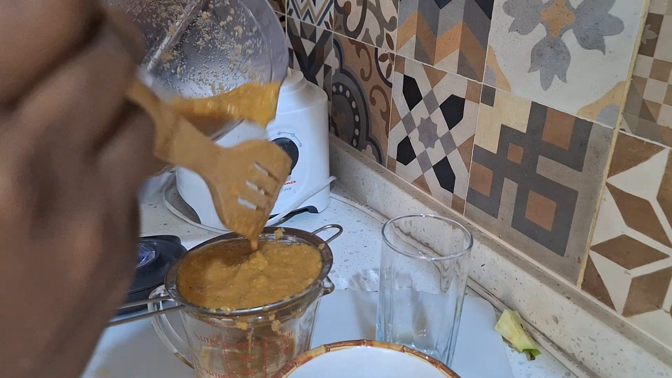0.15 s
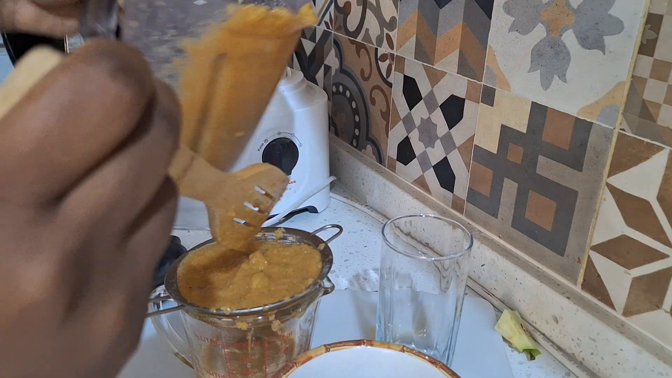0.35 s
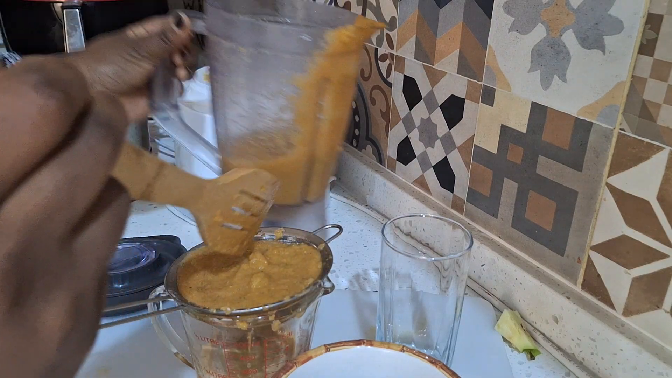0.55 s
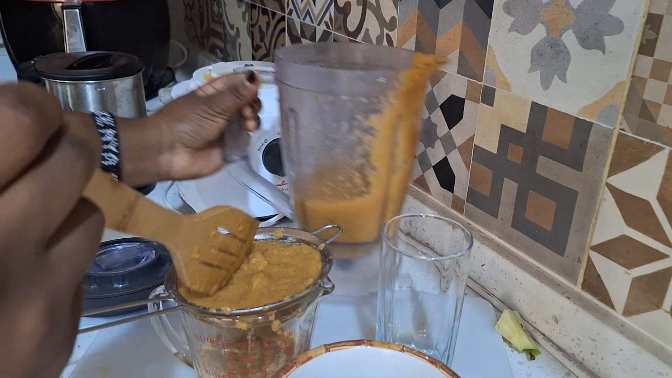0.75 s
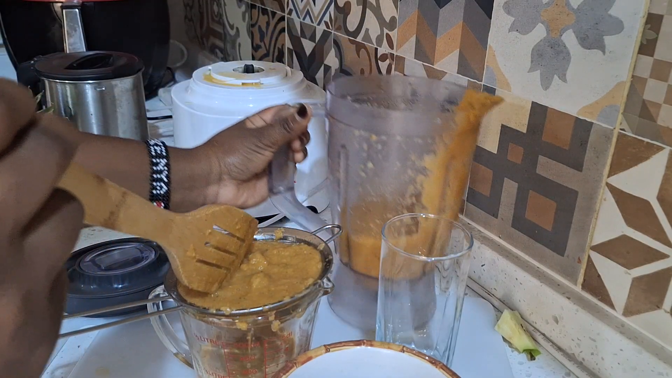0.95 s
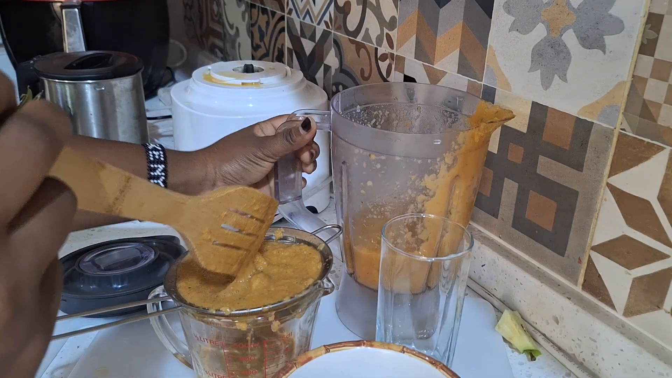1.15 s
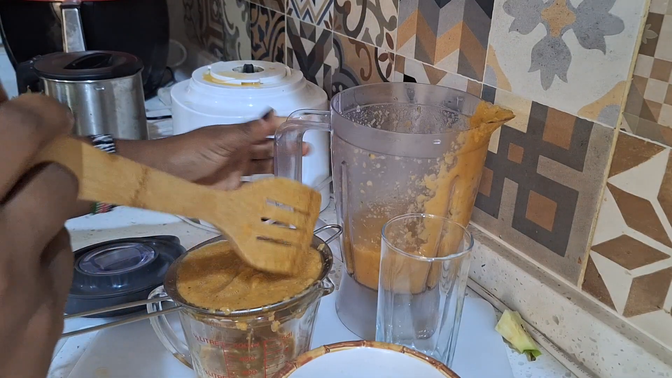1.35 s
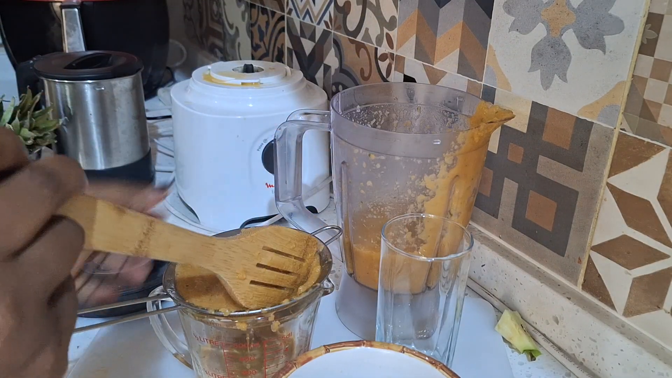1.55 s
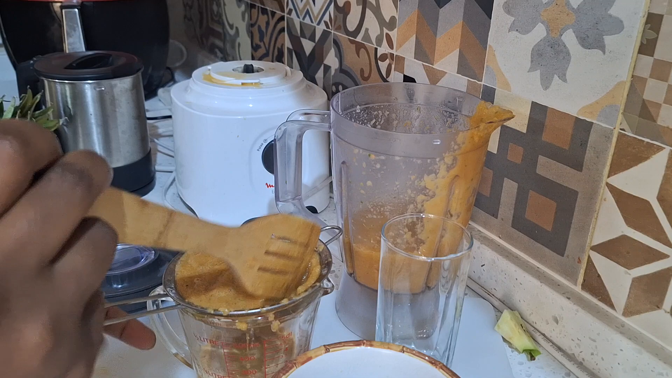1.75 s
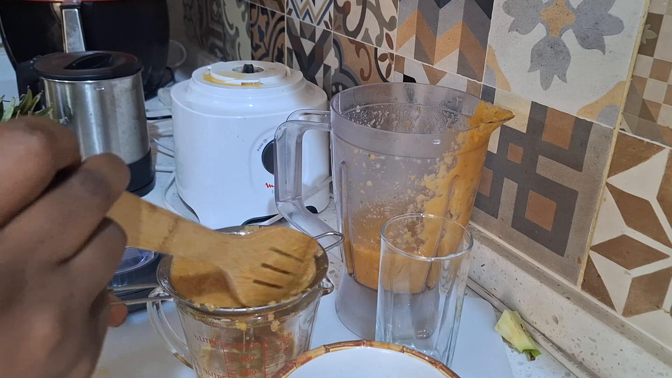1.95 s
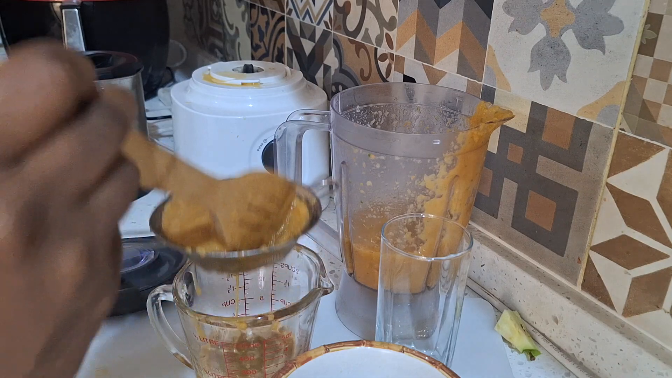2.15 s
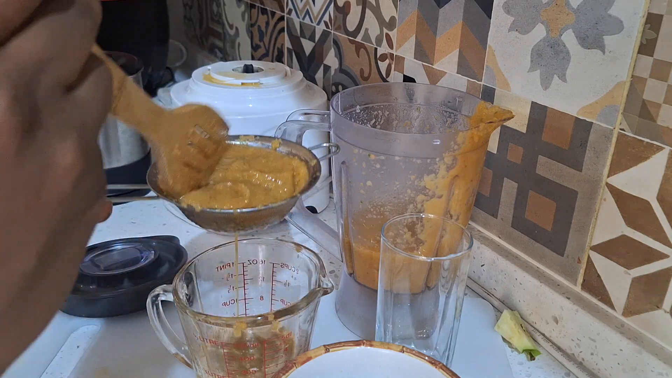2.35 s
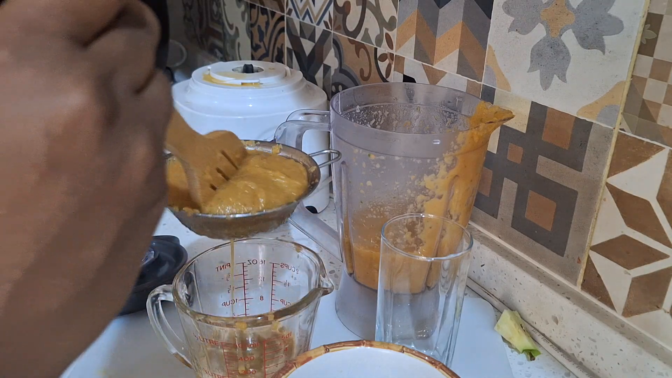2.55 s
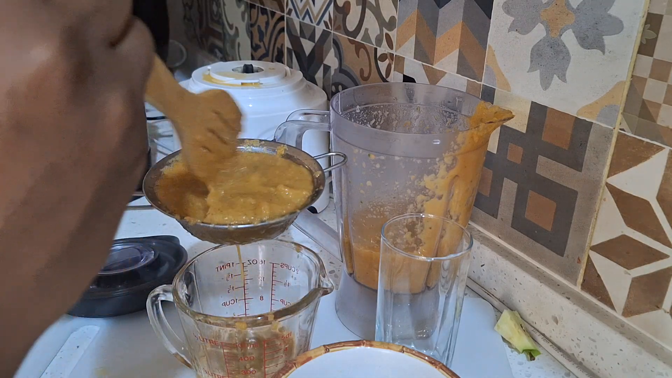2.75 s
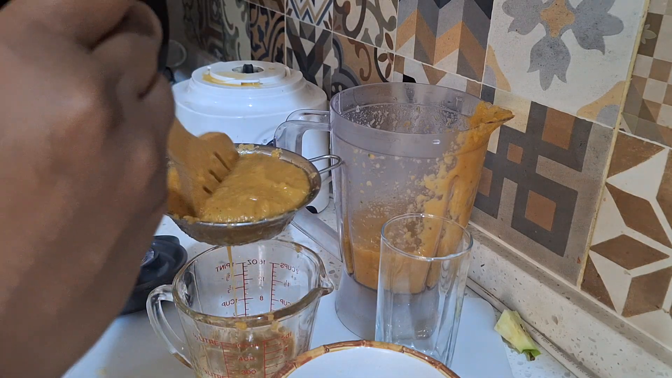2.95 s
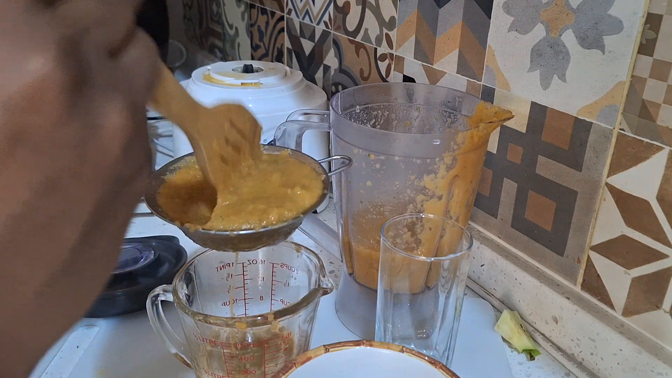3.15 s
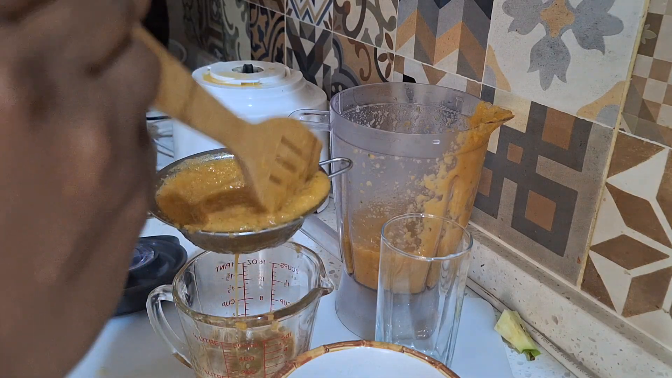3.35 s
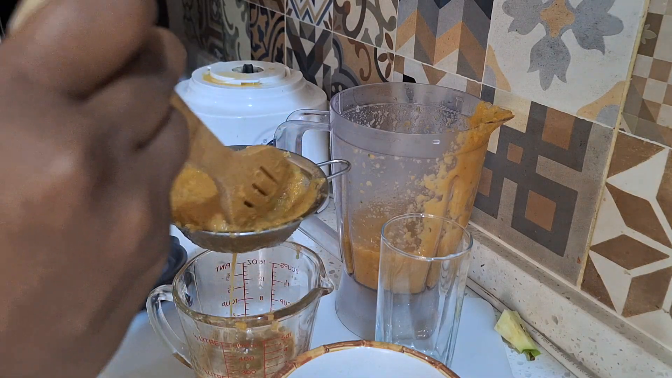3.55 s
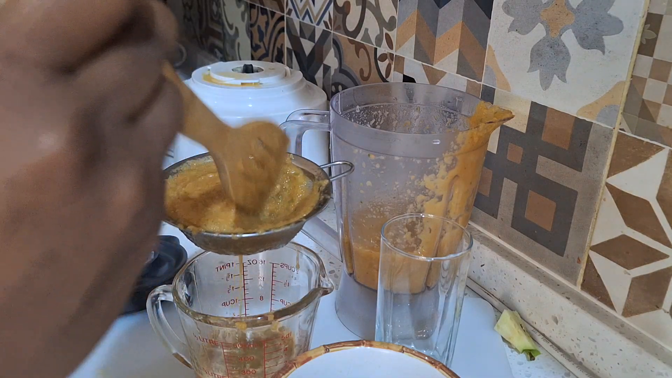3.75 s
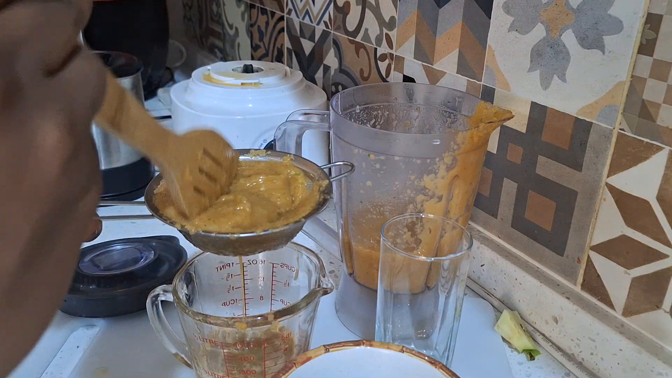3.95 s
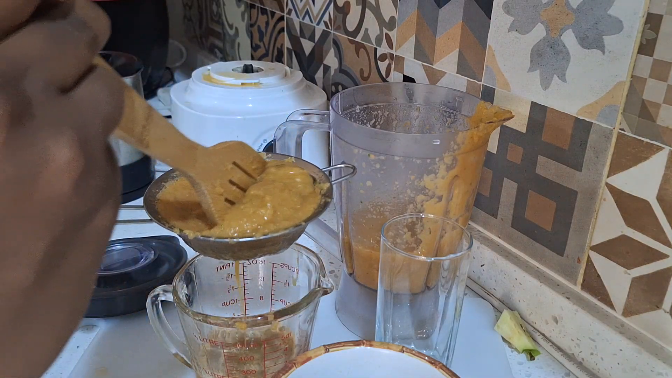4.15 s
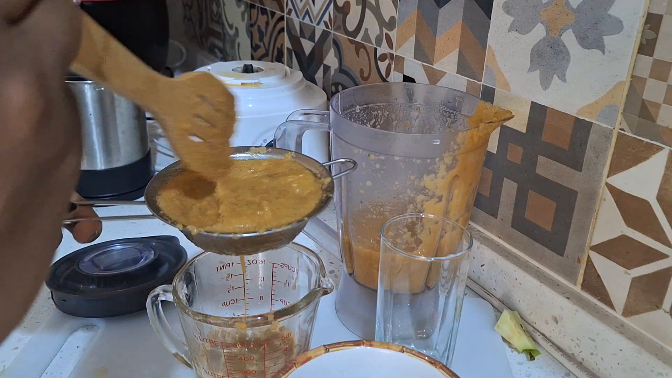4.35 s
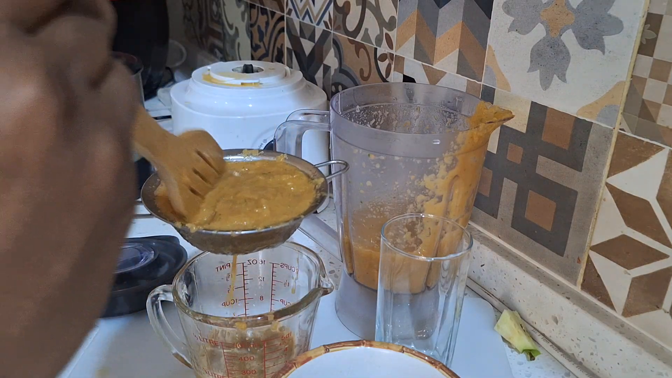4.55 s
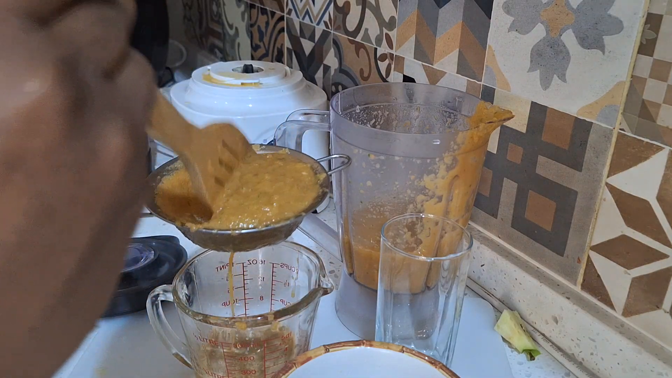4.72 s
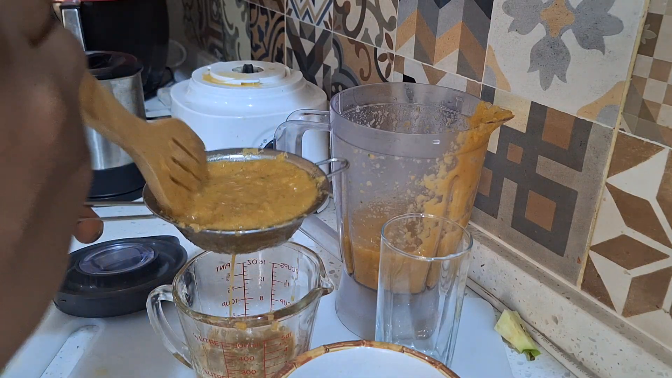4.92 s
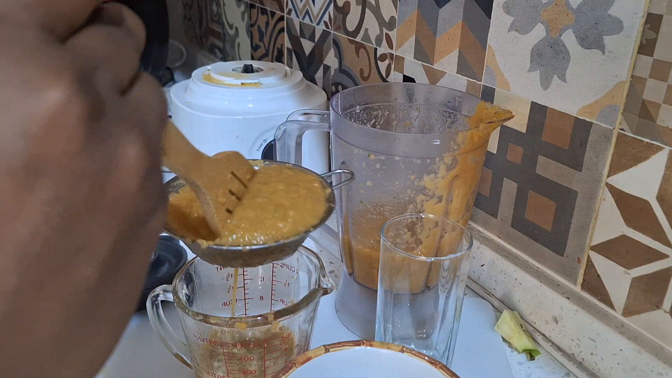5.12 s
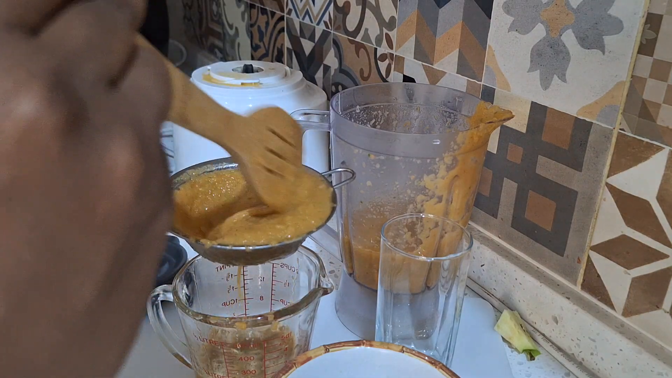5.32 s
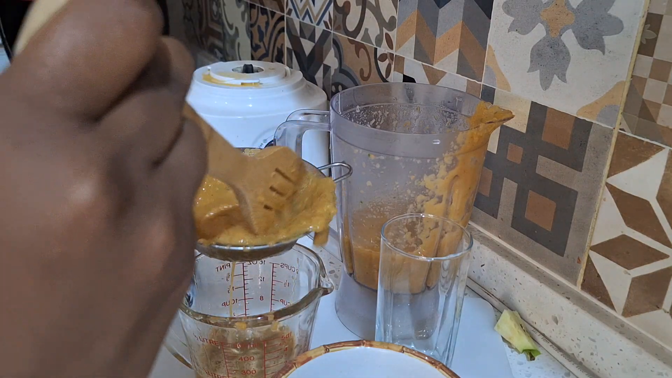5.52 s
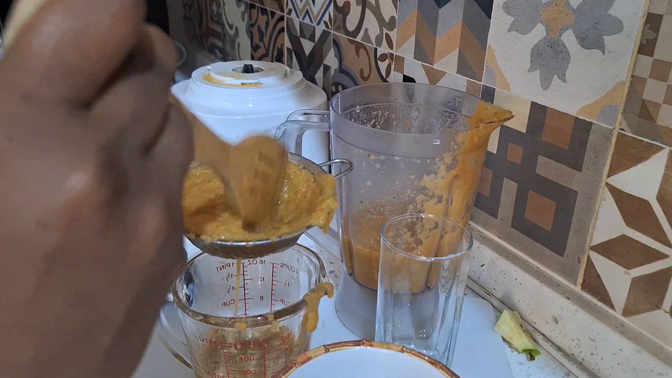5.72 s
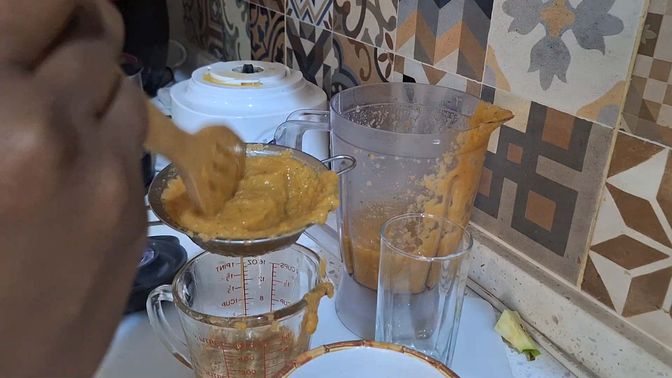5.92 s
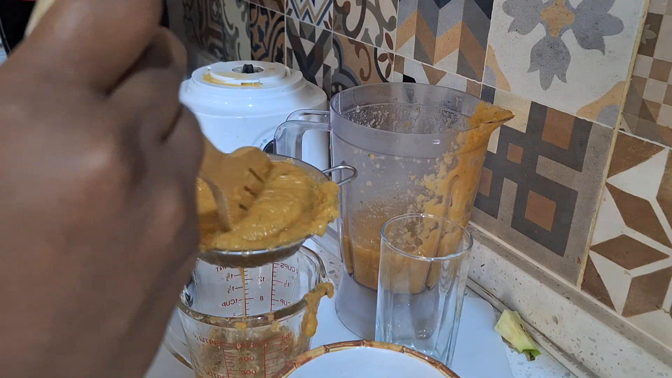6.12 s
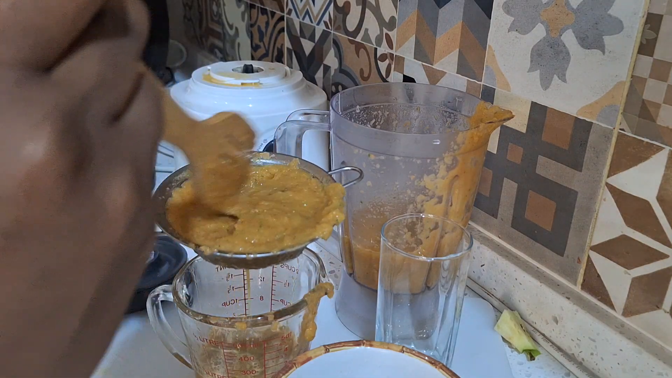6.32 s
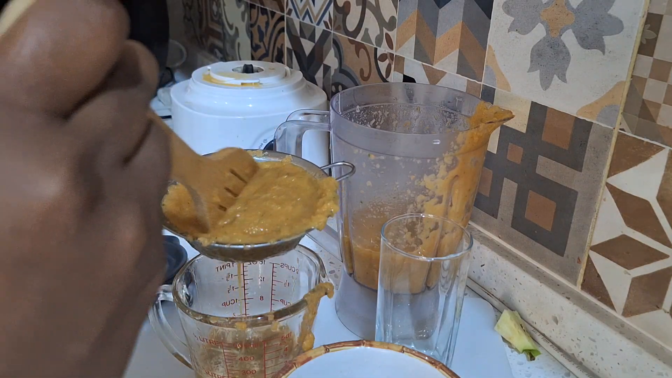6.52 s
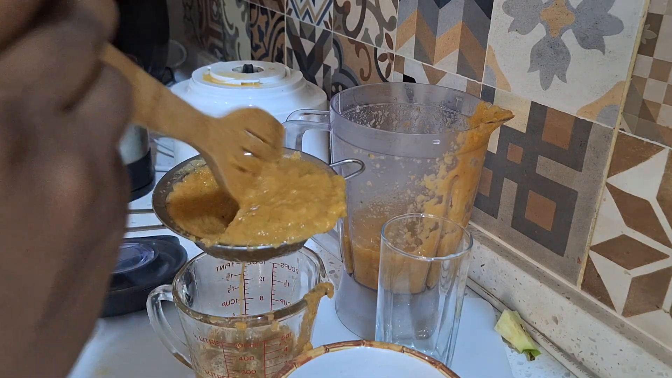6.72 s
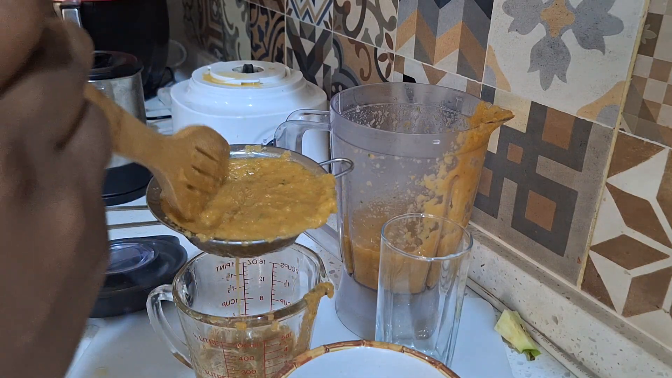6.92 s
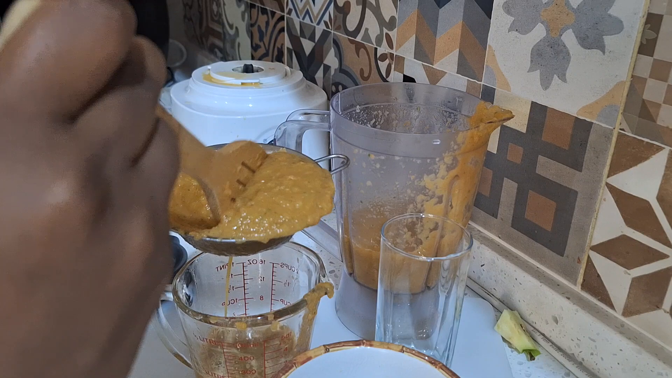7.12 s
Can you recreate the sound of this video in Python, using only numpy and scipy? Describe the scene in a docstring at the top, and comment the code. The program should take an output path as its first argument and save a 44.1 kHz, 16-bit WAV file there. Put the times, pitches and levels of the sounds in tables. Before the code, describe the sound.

Quiet hum first, then a single heavy plastic thump at the right with fast, softening bounces. A faint tick or two follows, then close, irregular wooden spatula strokes in a metal strainer, with small hollow knocks, wet smacks of pulp, fine gritty rasping and thin wire clicks. The hard tiled kitchen adds a short bright echo, while low rumble continues underneath until the end.

```python
"""A wooden spatula works fruit pulp through a wire sieve: clicks ring the bowl for the rasp, filtered
grains and rising blips squelch, and struck modes knock, smack, tick and sing in the steel rim.
Before the main strokes, a plastic blender jar lands on the counter and rocks to rest: filtered blows
excite a modal boom and a rattle. Echoes and a fading tail place these sources in a tiled kitchen.
Wavering sines make a low hum, and shaped noise a steady room rumble."""
import sys
import numpy as np
from scipy import signal
from scipy.fft import rfft, irfft
from scipy.io import wavfile
from scipy.ndimage import uniform_filter1d

SR = 44100
rng = np.random.default_rng(int(sys.argv[2]) if len(sys.argv) > 2 else 0)


def waveform_to_disk(signal):
    """Save audio, clipped to [-1, 1], as 16-bit WAV at the path in sys.argv[1]."""
    frames = np.transpose(np.atleast_2d(signal))
    scaled = np.clip(frames, -1, 1) * 32767
    samples = np.round(scaled).astype(np.int16)
    wavfile.write(sys.argv[1], SR, samples)


N = 321048  # length in samples

# resonances of the sieve bowl, damped by pulp: [pitch_hz, relative_level_db, t60_s]
BOWL_MODES = [(944, 1.5, 0.14), (1251, -4.5, 0.0073), (1453, -17.5, 0.055), (1800, -38, 0.0062),
              (2550, -27, 0.0033), (2350, 14.5, 0.008), (3620, 2.5, 0.033), (4830, -4.5, 0.045)]
# spectrum of the wet squelch: [frequency_hz, gain_db]
SQUELCH_SPECTRUM = [(1400, -37), (2100, -9), (2550, 10.5), (3000, -7.5), (3600, 7.5), (4300, -11.5),
                    (5000, -1.5), (6300, -18), (9000, -21)]
# spectrum of the fine fizz: [frequency_hz, gain_db]
FIZZ_SPECTRUM = [(3000, -24), (5500, -0.5), (7000, -4), (8300, 0.5), (9500, -12.5), (12500, 1),
                 (16000, -12)]
# fade of each layer over the stated length of a stroke
RASP_FADE_DB, SQUELCH_FADE_DB, FIZZ_FADE_DB = -11, -9, -8.5


def scraping():
    """Wood catches on wire after wire and shakes the bowl, while pulp squeezes through the holes."""
    t = np.arange(SR // 8) / SR
    bowl = sum(amp(db) * ring(t, hz, t60) for hz, db, t60 in BOWL_MODES[1:4])
    rasp = evened(signal.oaconvolve(grains(per_s=170, spread_db=2.0), bowl)[:N])
    wet_grains = evened(colour(grains(per_s=320, spread_db=2.5), SQUELCH_SPECTRUM))
    squelch = evened(0.75 * wet_grains + bubbles(count=520))
    fizz = evened(colour(grains(per_s=300, spread_db=6.5), FIZZ_SPECTRUM))
    catching = evened(amp(2.6 * drift(hz=45.3)))  # the spatula sticks and slips
    mesh = rasp * pressure(axis=2, fade_db=RASP_FADE_DB)
    pulp = squelch * pressure(axis=3, fade_db=SQUELCH_FADE_DB)
    pulp += fizz * pressure(axis=4, fade_db=FIZZ_FADE_DB)
    return catching * (mesh + pulp)


def bubbles(count):
    """Tiny air pockets burst in the pulp, each a short blip that rises in pitch."""
    t, out = np.arange(SR // 40) / SR, np.zeros(N)
    for place, size, pitch, glide in rng.random((count, 4)):
        start_hz = 1550 * 3.4 ** pitch
        blip = ring(t * (1 + 6 * glide * t), start_hz, t60=42 / start_hz)
        add(out, place * N / SR, amp(-18 * size ** 2.6 - 6 * pitch) * blip)
    return evened(out)


# strokes of the spatula, each layer's level before its easing:
# [start_s, length_s, mesh_rasp_db, pulp_squelch_db, fine_fizz_db]
STROKES = [(1.837, 0.23, -80, -84, -78.5), (2.408, 0.47, -55.5, -62.5, -67), (2.958, 0.3, -52.5, -62, -68),
           (3.374, 0.35, -58.5, -74, -76), (3.577, 0.16, -68, -62.5, -69), (3.764, 0.3, -54, -63, -68),
           (4.081, 0.28, -60.5, -69, -84), (4.356, 0.31, -59, -63.5, -66), (4.687, 0.17, -58.5, -64, -67),
           (4.853, 0.22, -55.5, -58, -80), (5.035, 0.28, -61.5, -63.5, -79), (5.453, 0.2, -58, -65, -73),
           (5.589, 0.16, -50, -63.5, -73), (5.774, 0.13, -57.5, -64.5, -71),
           (5.959, .29, -56.5, -67.5, -71.5), (6.292, 0.17, -63, -65.5, -73),
           (6.47, .19, -56, -71.5, -74.5), (6.766, 0.38, -60.5, -69.5, -73.5),
           (7.061, 0.2, -60.5, -62.5, -71)]
BITE_S, LIFT_S = 0.013, 0.072  # quick onset, and release past the stated length


def pressure(axis, fade_db):
    """Each stroke bites quickly, eases off as the pulp gives way, and lifts: the gain of one layer."""
    out = np.zeros(N)
    for stroke in STROKES:
        start, length = stroke[:2]
        t = np.arange(0, length + LIFT_S, 1 / SR)
        bite = np.minimum(t / BITE_S, 1)
        lift = np.clip((length + LIFT_S - t) / LIFT_S, 0, 1)
        add(out, start, bite * lift * amp(stroke[axis] + fade_db * t / length))
    return out


SMALL_SPREAD_DB = 5.5  # either side of the layer's level


def scattered(per_s, axis):
    """Chance moments within the strokes, near one layer's level: [time_s, level_db, share from 0 to 1]."""
    rows = []
    for stroke in STROKES:
        start, length = stroke[:2]
        for k, (place, size, share) in enumerate(rng.random(size=(16, 3))):
            after = (k + place) / per_s
            if after < length:
                level_db = stroke[axis] + SMALL_SPREAD_DB * (2 * size - 1)
                rows.append((start + after, level_db, share))
    return rows


# spatula knocks into pulp and mesh; the last column is relative to the knock:
# [start_s, level_db, gloop_start_pitch_hz, upper_modes_db]
KNOCKS = [(2.413, -39.5, 772, -6), (2.471, -42, 1554, -11), (2.622, -43, 1237, -9),
          (2.761, -47.5, 1670, -13), (2.972, -47, 1386, -8), (3.018, -48, 1196, -18),
          (3.051, -41.5, 1186, -5), (3.223, -49, 1230, -18), (3.378, -46, 1406, -15),
          (3.619, -53.5, 1190, 4), (3.763, -38.5, 1088, -4), (3.824, -42.5, 1185, -16),
          (3.857, -44.5, 1194, -27), (3.988, -46.5, 1206, 0.5), (4.695, -46, 974, -18),
          (4.723, -47.5, 945, -11), (4.748, -45, 963, -6), (4.855, -41, 1163, -20), (4.861, -36, 955, -18),
          (4.94, -41, 1070, -18), (5.034, -41, 1477, -8), (5.464, -55, 1632, 0), (5.587, -36, 975, -29),
          (5.599, -37.5, 1416, -8), (5.967, -42.5, 1097, -25), (6.022, -45, 1192, -12),
          (6.135, -44.5, 1476, -25), (6.306, -54.5, 1670, -32), (6.813, -43, 983, -23),
          (6.867, -49, 1024, -7.5), (7.186, -49, 1161, -11)]


def knocks():
    """The spatula shakes the bowl and the pulp gloops, its pitch rising as the hollow closes."""
    t, out = np.arange(SR // 8) / SR, np.zeros(N)
    for s, db, gloop_hz, upper_db in KNOCKS:
        modes = [amp(d) * ring(t, hz * rng.uniform(0.99, 1.07), t60) for hz, d, t60 in BOWL_MODES]
        # the glide warps time, so it also hastens the decay
        gloop = 4.6 * ring(t * (1 + rng.uniform(0, 4.1) * t), gloop_hz, t60=0.071)
        lower = sum(modes[:4]) + gloop + .5 * ring(t, 685, t60=0.009)
        knock = struck(t, lower, chatter=.05, t60=.04)
        scratch = struck(t, sum(modes[4:]), chatter=0.12, t60=0.018)
        add(out, s, amp(db) * (knock + amp(upper_db) * scratch))
    return out


# the loudest smacks of the wet pulp: [start_s, level_db, cavity_start_pitch_hz]
SMACKS = [(2.411, -43, 2195), (2.49, -41.5, 3410), (2.622, -58, 2480), (2.66, -46.5, 3530),
          (2.725, -49, 2350), (2.81, -44, 2120), (3.073, -50, 2580), (3.18, -44.5, 3240),
          (3.218, -48.5, 2585), (3.343, -48.5, 2750), (3.377, -51, 1740), (3.527, -52.5, 3640),
          (3.896, -46, 3560), (3.949, -49, 1792), (4.035, -47, 2397), (4.149, -53, 2110),
          (4.385, -51, 3060), (4.426, -47, 2510), (4.616, -52.5, 2500), (4.892, -48.5, 2285),
          (5.038, -49, 2130), (5.085, -49, 2210), (5.158, -46, 3990), (5.218, -51.5, 2400),
          (5.491, -49.5, 2190), (5.525, -45, 3630), (5.553, -45, 2345), (5.685, -46.5, 3570),
          (5.775, -43.5, 3420), (5.825, -50, 3190), (5.986, -51, 4860), (6.045, -57, 2340),
          (6.291, -52.5, 3500), (6.317, -47, 1682), (6.408, -53, 1780), (7.07, -53, 2450),
          (7.105, -50.5, 2230), (7.17, -50, 2250)]
# fainter smacks scattered through the strokes: rate, level over the squelch, pitch range
SMALL_SMACKS_PER_S, SMALL_SMACK_OVER_SQUELCH_DB, SMALL_SMACK_HZ = 12, 7, (1800, 3640)


def smacks():
    """A small pocket in the pulp opens and rings for a few gliding cycles, with a wet crackle."""
    t, out = np.arange(SR // 12) / SR, np.zeros(N)
    low, high = SMALL_SMACK_HZ
    small = [(s, db + SMALL_SMACK_OVER_SQUELCH_DB, low * (high / low) ** share)
             for s, db, share in scattered(SMALL_SMACKS_PER_S, axis=3)]
    for s, db, hz in SMACKS + small:
        cavity = ring(t * (1 + rng.uniform(-7, 12) * t), hz, t60=.013)  # glides down or up
        pocket = struck(t, cavity, chatter=0.14, t60=0.053)
        crackle = topped(colour(burst(t, t60=0.018), SQUELCH_SPECTRUM))
        add(out, s, amp(db) * topped(pocket + 0.78 * crackle))
    return out


# the clearest sharp ticks, mostly slipping wires: [start_s, ring_db, dull_snap_db, sharp_snap_db]
TICKS = [(1.228, -72, -61, -61), (1.51, -69, -54.5, -58), (1.853, -77, -68, -72), (2.042, -74, -69, -72),
         (2.339, -75, -56, -65), (2.412, -68, -48.5, -64), (2.49, -63, -53, -60), (2.5045, -51, -51, -46),
         (2.7613, -75, -66, -46), (2.8075, -63, -69, -48.5), (2.901, -58, -58, -43),
         (2.963, -51.5, -57.5, -59.5), (3.0511, -77, -74, -52), (3.091, -58, -50.5, -50.5),
         (3.216, -70, -48.5, -52), (3.247, -70, -61, -57.5), (3.343, -52.5, -57.5, -66),
         (3.3773, -53, -51, -52.5), (3.5253, -74, -54, -65), (3.62, -66, -75, -61), (3.865, -52, -56, -56),
         (3.9335, -75, -55, -61.5), (4.314, -31.5, -76, -65), (4.84, -46, -68, -51),
         (4.89, -51, -46, -44.5), (5.034, -44, -44, -52), (5.302, -45.5, -75, -65),
         (5.463, -65, -50.5, -48), (5.525, -72, -72, -53), (5.7744, -65, -48, -76), (5.966, -52, -58, -55),
         (6.053, -72, -53, -53), (6.268, -57, -76, -57), (6.291, -49, -48, -52.5), (6.628, -61, -70, -61),
         (6.7346, -53, -67, -51.5), (7.263, -62, -68, -56.5)]
# nominal resonances of a mesh wire: [pitch_hz, relative_level_db, t60_s]
WIRE_MODES = [(7980, 3, 0.031), (8280, 0, 0.022), (8095, 3, 0.016)]
# spectrum of the dull snap: [frequency_hz, gain_db]
DULL_SNAP_SPECTRUM = [(2500, -35), (4500, 9), (5600, 7.5), (7000, 5), (8500, 4), (12000, -37), (16000, -24)]
# spectrum of the sharp snap: [frequency_hz, gain_db]
SHARP_SNAP_SPECTRUM = [(3000, -9), (7000, -4.5), (9500, 11), (12000, 15.5), (16000, 2)]
# fainter ticks scattered through the strokes: rate, then ring, dull and sharp levels over the fizz
SMALL_TICKS_PER_S, SMALL_TICK_OVER_FIZZ_DB = 9, (-0.5, 5.5, 7)


def ticks():
    """A wire slips with a snap and a very short, high ring."""
    t, out = np.arange(SR // 12) / SR, np.zeros(N)
    small = [(s, *(db + np.array(SMALL_TICK_OVER_FIZZ_DB)))
             for s, db, _ in scattered(SMALL_TICKS_PER_S, axis=4)]
    for s, ring_db, dull_db, sharp_db in TICKS + small:
        modes = sum(amp(d) * ring(t, hz * rng.uniform(0.99, 1.04), t60) for hz, d, t60 in WIRE_MODES)
        wire = struck(t, modes, chatter=0.046, t60=0.0044)
        slip = burst(t, t60=0.013) + 0.3 * burst(t, t60=0.041)
        dull = amp(dull_db) * topped(colour(slip, DULL_SNAP_SPECTRUM))
        sharp = amp(sharp_db) * topped(colour(slip, SHARP_SNAP_SPECTRUM))
        add(out, s, amp(ring_db) * wire + dull + sharp)
    return out


# rubs on the steel rim, level before the swell and uneven grip: [start_s, level_db, t60_s]
RIM_RUBS = [(1.821, -57, 0.23), (1.957, -62, 0.23), (2.476, -39.5, 0.37), (2.591, -47.5, 0.48),
            (2.68, -49.5, 0.33), (3.249, -54, .45), (3.38, -57, .4), (5.028, -50, 0.24)]
RIM_HZ = 1538


def rim():
    """A rub swells the ring of the steel rim, which then dies away."""
    t, out = np.arange(SR) / SR, np.zeros(N)
    swell = 1 - np.exp(-t / 0.0081)
    for s, db, t60 in RIM_RUBS:
        add(out, s, amp(db) * ring(t, RIM_HZ, t60) * swell)
    grip = evened(amp(1.15 * drift(hz=45)))  # the grip of the wood is uneven
    return out * grip


# the jar lands and rocks; hardness is the upper edge of the blow:
# [start_s, boom_db, hardness_hz, rattle_db]
JAR_BLOWS = [(1.0096, -10, 950, -15.5), (1.0493, -13, 310, -26.5), (1.085, -17.5, 129, -45),
             (1.128, -22, 120, -54), (1.167, -26, 132, -40), (1.218, -44, 200, -45)]
# resonances of jar and counter top: [pitch_hz, relative_level_db, t60_s]
JAR_MODES = [(81.7, -12.5, 0.26), (100.5, -6.5, 0.36), (124.7, -5.5, 0.26), (163, -2.5, 0.073),
             (263, -8.5, 0.27), (278, -5, 0.18), (339, -1, 0.053), (387, -19, 0.057), (548, -9.5, 0.068),
             (798, -11.5, 0.069), (980, -29, 0.097)]
# spectrum of the rattling plastic: [frequency_hz, gain_db]
JAR_RATTLE_SPECTRUM = [(200, -30), (600, 12.5), (950, 5.5), (1400, -5.5), (2100, -2.5), (3000, -8),
                       (4300, -8.5), (5400, -12.5), (6800, -19), (8200, -19), (10000, -28), (16000, -27)]


def jar():
    """Each landing cracks and rattles the plastic, then booms in the counter; later booms are softer."""
    t, out = np.arange(SR // 2) / SR, np.zeros(N)
    body = sum(amp(d) * ring(t, hz, t60) for hz, d, t60 in JAR_MODES)
    body = signal.sosfilt(signal.butter(4, 60, "high", fs=SR, output="sos"), body)
    for s, db, hard_hz, rattle_db in JAR_BLOWS:
        boom = signal.sosfilt(signal.butter(2, hard_hz, fs=SR, output="sos"), body)
        force = .06 * burst(t, t60=.014) + .018 * burst(t, t60=.11)
        force[0] = 1  # the first hard contact
        rattle = topped(colour(force, JAR_RATTLE_SPECTRUM))
        rattle_edge_hz = min(12 * hard_hz, SR / 3)
        rattle = signal.sosfilt(signal.butter(1, rattle_edge_hz, fs=SR, output="sos"), rattle)
        add(out, s + 0.001306, amp(db) * boom)
        add(out, s, amp(rattle_db) * rattle)
    return out


# level path of the low hum tone: [time_s, level_db]
HUM_LEVEL = [(0.0, -34), (0.252, -35.5), (0.49, -44), (0.556, -35.5), (0.97, -38), (1.35, -35.5),
             (1.48, -42), (2.95, -36.5), (3.02, -32.5), (3.35, -39), (3.73, -33.5), (3.93, -46),
             (3.98, -35.5), (4.44, -38.5), (4.92, -33.5), (5.53, -39.5), (5.56, -59), (5.61, -36),
             (6.17, -34), (6.35, -48.5), (6.42, -37.5), (6.67, -34.5), (6.77, -57), (6.9, -38.5),
             (7.25, -33), (7.28, -35.5)]


def hum():
    """A low hum that wavers in pitch and level, with a faint fuzzy tone above it."""
    t = np.arange(N) / SR
    low = np.sin(2 * np.pi * 100.6 * t + 0.72 * drift(hz=9.2))
    low *= 1 + 0.067 * drift(hz=34)
    upper = np.sin(2 * np.pi * 337 * t + 1.25 * drift(hz=15))
    upper *= 1 + 0.22 * drift(hz=13)
    level = amp(np.interp(t, *np.transpose(HUM_LEVEL)))
    return low * level + amp(-64.0) * evened(upper)


# relative spectrum of the still room: [frequency_hz, density_db_per_hz]
AIR_SPECTRUM = [(20, -21.5), (62, 4), (85, -11.5), (110, 3.5), (150, -2.5), (175, -8.5), (235, -17.5),
                (340, -16.5), (650, -20), (1000, -35), (1400, -39), (2100, -43.5), (3500, -50.5),
                (7000, -58), (16000, -52.5)]
# left-right likeness, for the rumble and the room tail: [frequency_hz, correlation (no unit)]
STEREO_LIKENESS = [(30, 0.7), (100, 1), (300, 0.53), (600, 0.48), (1200, 0), (3000, 0)]
AIR_DB = -44.5  # overall rms level


def air():
    """Steady room rumble from shaped noise, most alike in both ears in the bass."""
    hz = np.fft.rfftfreq(N, 1 / SR)
    a, b = rfft(rng.standard_normal((2, N)))
    same = np.clip(read(STEREO_LIKENESS, hz), -1, 1)
    pair = np.array([a, same * a + np.sqrt(1 - same ** 2) * b])
    pair *= amp(read(AIR_SPECTRUM, hz))
    return amp(AIR_DB) * evened(irfft(pair, N))


# decay time of the room: [frequency_hz, t60_s]
ROOM_T60 = [(100, 0.13), (300, 0.4), (800, 0.68), (2500, 0.67), (8000, 0.51), (15000, 0.86)]


def kitchen(x, lead_s, near_db, tail_db):
    """Direct sound reaches one channel first; counter and tiles answer, then the room dies away."""
    hz, t, z = signal.stft(rng.standard_normal((2, SR)), SR, nperseg=256)
    same = np.clip(read(STEREO_LIKENESS, hz), -1, 1)[:, None]
    z[1] = same * z[0] + np.sqrt(1 - same ** 2) * z[1]
    z *= (hz / np.hypot(hz, 420))[:, None]  # little bass comes back
    decay = amp(-60 * t / read(ROOM_T60, hz)[:, None])
    tail = signal.istft(z * decay, SR, nperseg=256)[1][:, :SR]
    t = np.arange(SR) / SR
    tail *= np.clip(t / 0.024, 0, 1)
    # sparse early echoes, without their bass
    near = rng.standard_normal((2, SR)) * (rng.random((2, SR)) < 2500 / SR)
    near *= amp(-60 * t / 0.03) * (t > .0008)
    near = signal.sosfilt(signal.butter(2, 600, "high", fs=SR, output="sos"), near)
    echo = sum(amp(db) * h / np.linalg.norm(h, axis=1, keepdims=True)
               for db, h in [(near_db, near), (tail_db, tail)])
    delay = np.exp(-2j * np.pi * np.fft.rfftfreq(N, 1 / SR) * lead_s)
    right = irfft(rfft(x) * delay, N)
    return np.array([x, right]) + signal.oaconvolve(x[None], echo, axes=1)[:, :N]


def amp(db):
    """Decibels to linear gain."""
    return 10 ** (np.asarray(db) / 20)


def evened(x):
    """Scales a sound to rms 1."""
    return x / np.sqrt(np.mean(x ** 2) + 1e-20)


def topped(x):
    """Scales a short sound so that its loudest 3 ms have rms 1."""
    return x / np.sqrt(uniform_filter1d(x ** 2, size=132).max() + 1e-20)


def read(points, hz):
    """Reads a curve between its points, along log frequency."""
    f, value = np.transpose(points)
    return np.interp(np.log(hz + 1), np.log(f + 1), value)


def add(mix, s, sound):
    """Lays a sound into the mix at s seconds, cut at the end."""
    part = mix[max(round(s * SR), 0):][:len(sound)]
    part += sound[:len(part)]


def colour(x, points):
    """Causal minimum-phase filter with the given spectrum."""
    log_gain = np.log(amp(read(points, abs(np.fft.fftfreq(2048, 1 / SR)))))
    taps = np.fft.ifft(np.exp(np.conj(signal.hilbert(log_gain)))).real
    return signal.oaconvolve(x, taps)[:len(x)]


def ring(t, hz, t60):
    """One resonance: a sine that falls 60 dB over t60 seconds of t."""
    return amp(-60 * t / t60) * np.sin(2 * np.pi * hz * t)


def burst(t, t60):
    """A dying cluster of tiny contacts."""
    return rng.standard_normal(len(t)) * amp(-60 * t / t60)


def struck(t, body, chatter, t60):
    """One blow and its short chatter set a body ringing."""
    force = chatter * burst(t, t60)
    force[0] = 1
    return topped(signal.fftconvolve(force, body)[:len(t)])


def grains(per_s, spread_db):
    """Random clicks, a few much larger than the rest."""
    size = amp(spread_db * np.minimum(rng.exponential(1, N), 3.5))
    return size * rng.choice([-1, 1], N) * (rng.random(N) < per_s / SR)


def drift(hz):
    """Slow chance with rms 1: noise with a soft upper edge."""
    f = np.fft.rfftfreq(N, 1 / SR)
    return evened(irfft(rfft(rng.standard_normal(N)) * np.exp(-(f / hz) ** 2), N))


# how much sooner sound reaches the left channel; the jar lands to the right
SIEVE_LEAD_S, JAR_LEAD_S = 0.00012, -0.000082


def scene():
    """Sieve and jar sound in the one small tiled kitchen, over the hum and the rumble."""
    sieve = kitchen(knocks() + smacks() + scraping(), SIEVE_LEAD_S, near_db=-1, tail_db=-4)
    wires = kitchen(ticks(), SIEVE_LEAD_S, near_db=0.0, tail_db=-4.0)
    steel = kitchen(rim(), SIEVE_LEAD_S, near_db=-46, tail_db=-4)
    counter = kitchen(jar(), JAR_LEAD_S, near_db=-6, tail_db=-2.5)
    return sieve + wires + steel + counter + hum() + air()


EDGE_HZ = 16100  # upper band limit


def record(dry):
    """The right channel is brighter at the very top; then the band limit."""
    # tone curves: (frequency_hz, gain_db)
    right = colour(dry[1], [(100, 2), (1200, 0.0), (4500, 1.5), (9000, 4), (13000, -0.5), (16000, -1.0)])
    left = colour(dry[0], [(100, 2.5), (1200, 1.03), (4500, 3.0), (9000, 3.5), (13000, -7.0), (16000, -4.0)])
    band = signal.firwin(511, EDGE_HZ, window=("kaiser", 9), fs=SR)
    return signal.oaconvolve(np.array([left, right]), band[None], "same")


dry = scene()
out = record(dry)
waveform_to_disk(out)
```